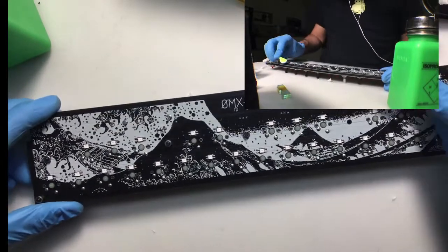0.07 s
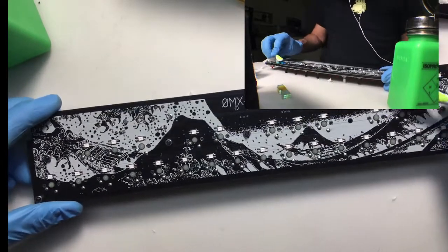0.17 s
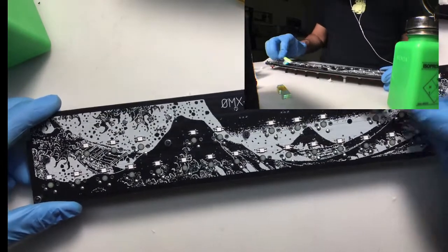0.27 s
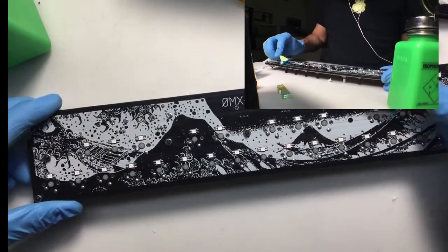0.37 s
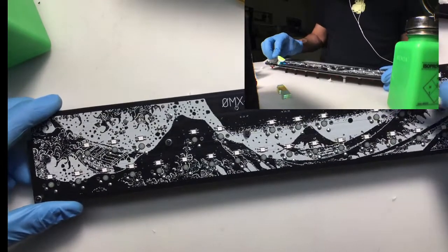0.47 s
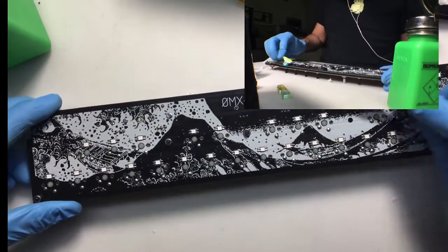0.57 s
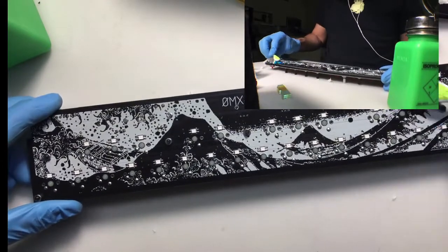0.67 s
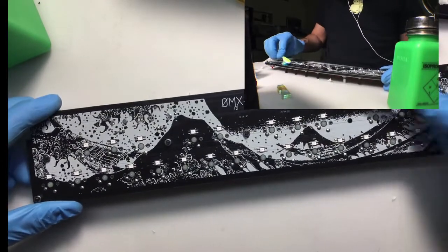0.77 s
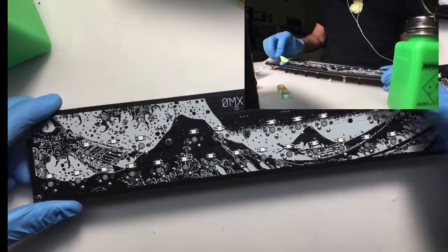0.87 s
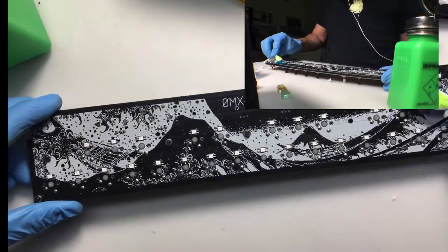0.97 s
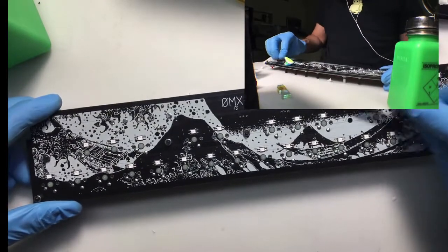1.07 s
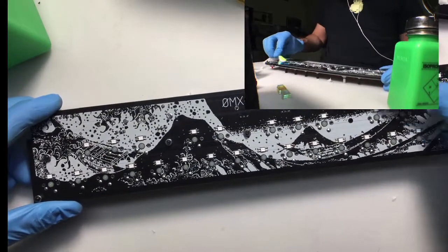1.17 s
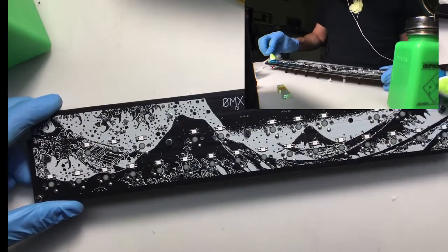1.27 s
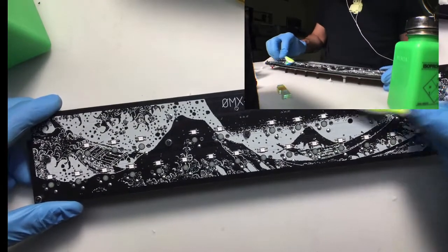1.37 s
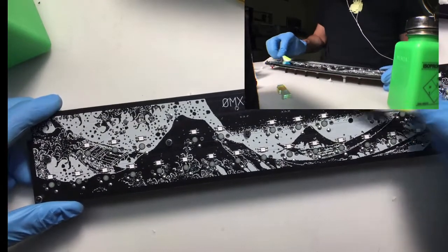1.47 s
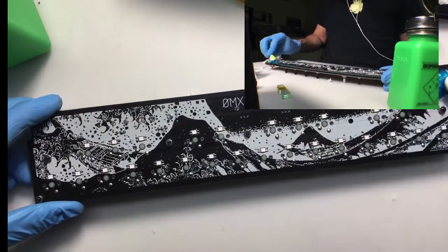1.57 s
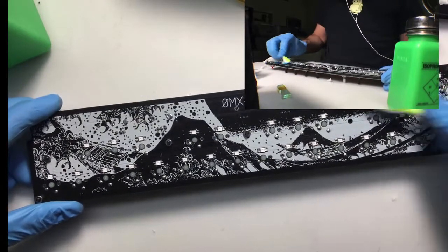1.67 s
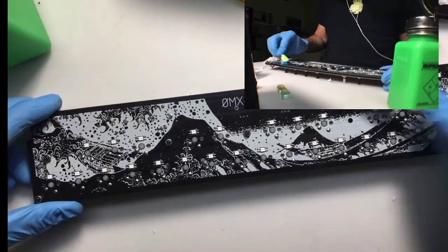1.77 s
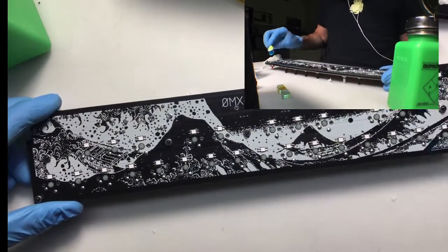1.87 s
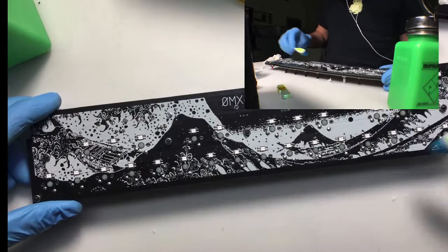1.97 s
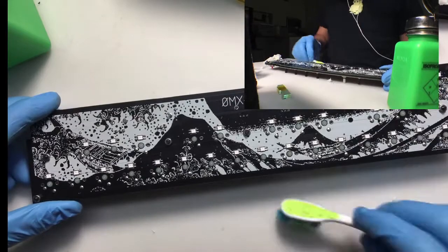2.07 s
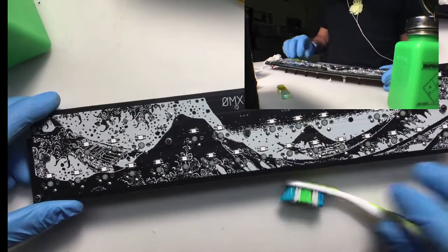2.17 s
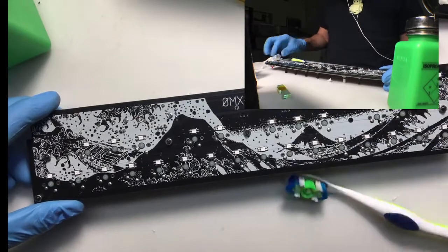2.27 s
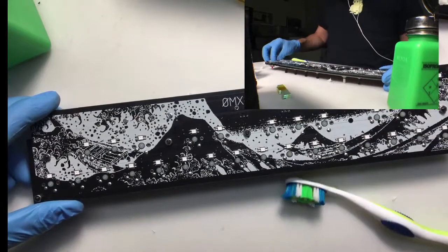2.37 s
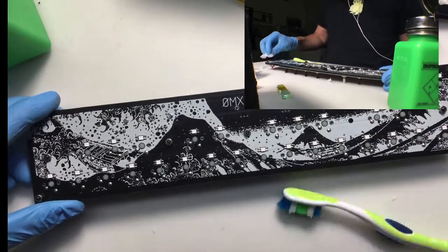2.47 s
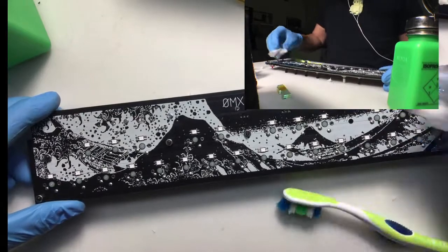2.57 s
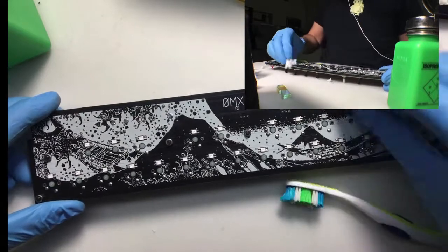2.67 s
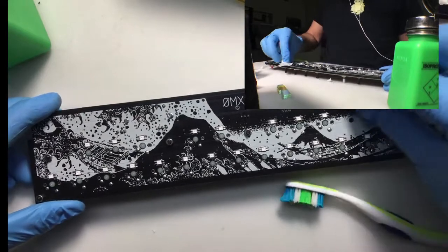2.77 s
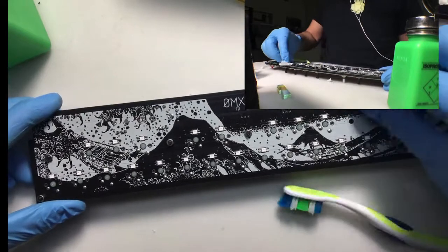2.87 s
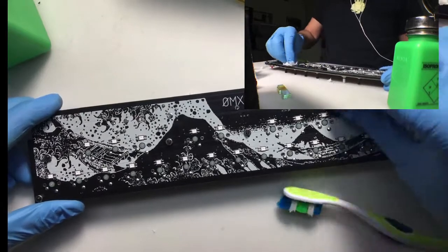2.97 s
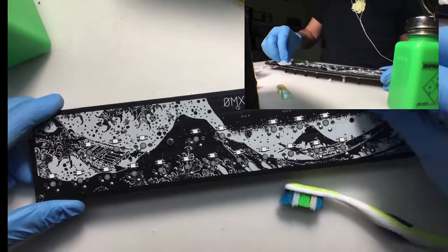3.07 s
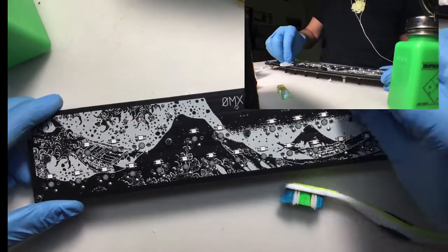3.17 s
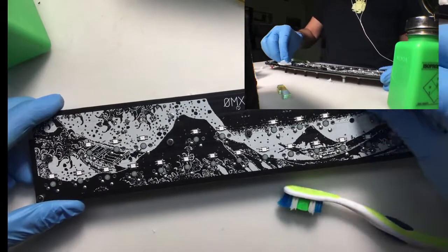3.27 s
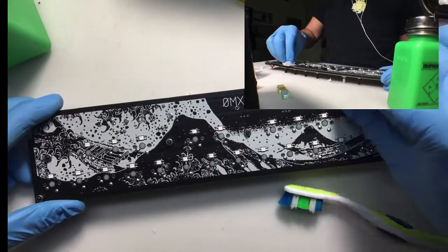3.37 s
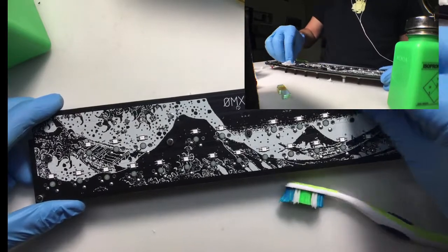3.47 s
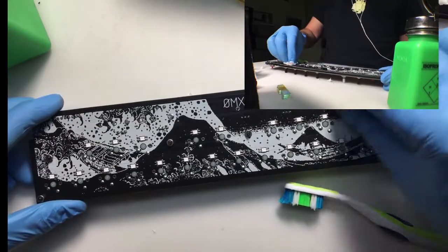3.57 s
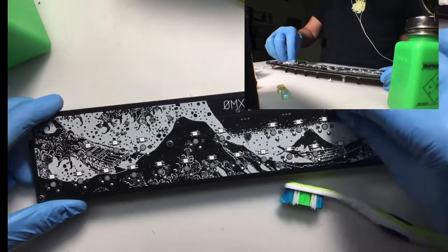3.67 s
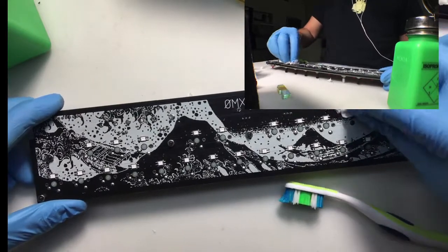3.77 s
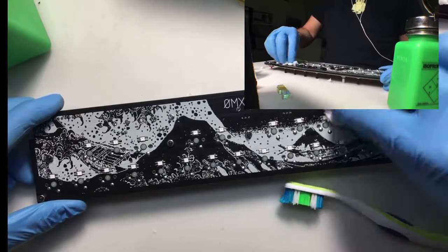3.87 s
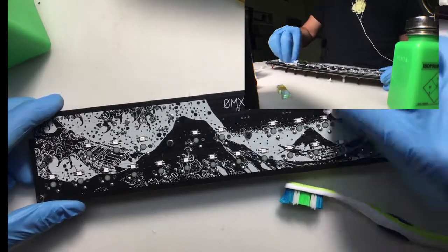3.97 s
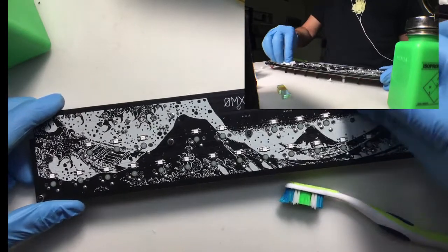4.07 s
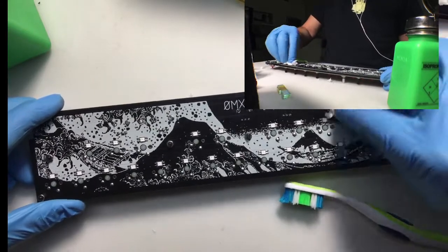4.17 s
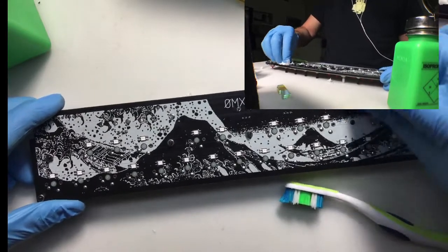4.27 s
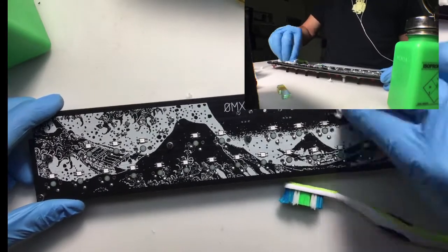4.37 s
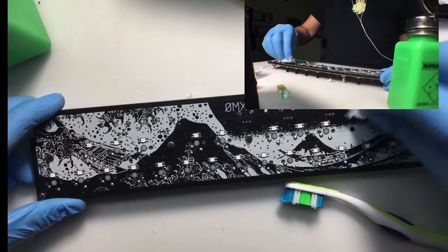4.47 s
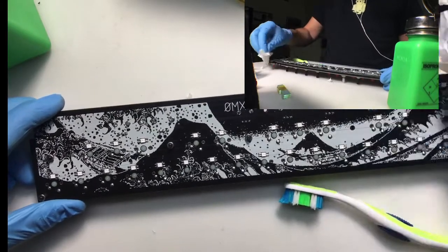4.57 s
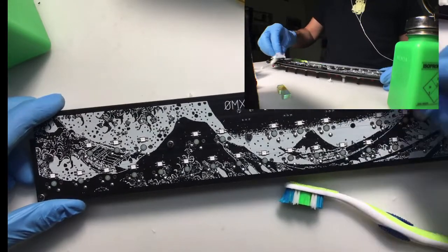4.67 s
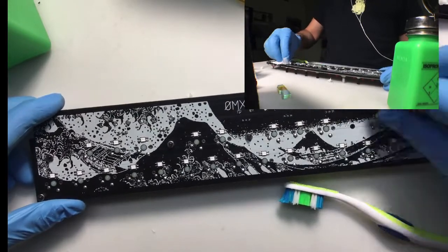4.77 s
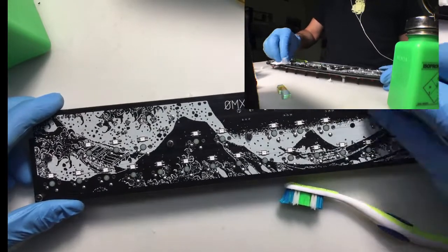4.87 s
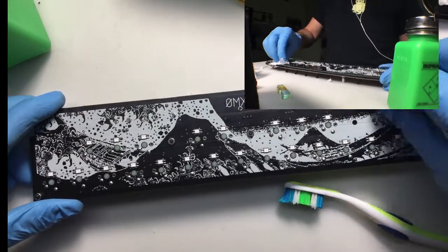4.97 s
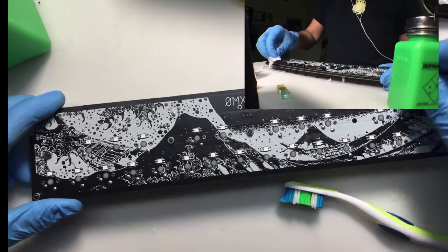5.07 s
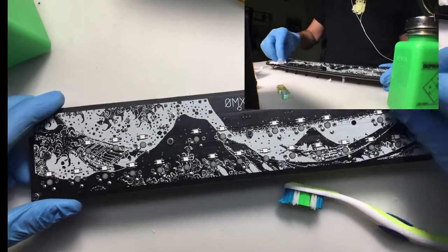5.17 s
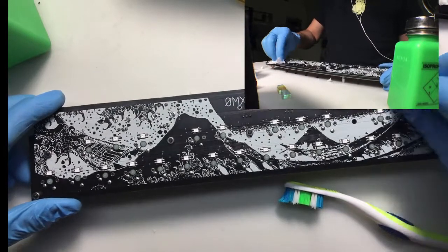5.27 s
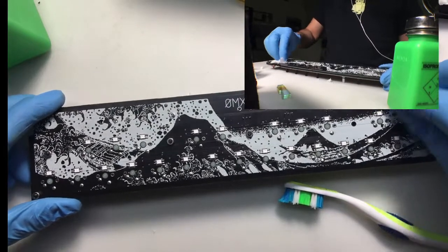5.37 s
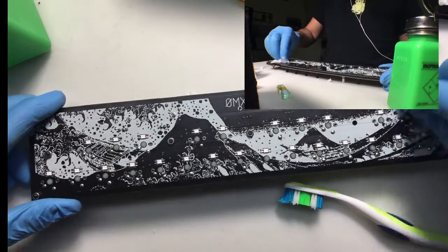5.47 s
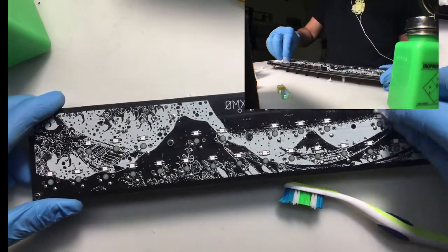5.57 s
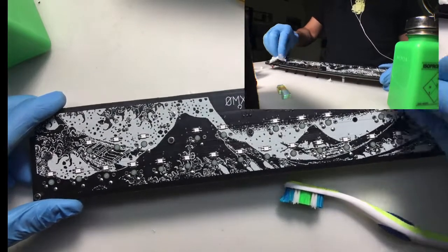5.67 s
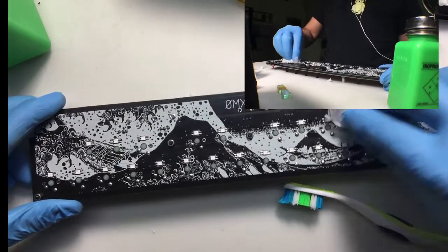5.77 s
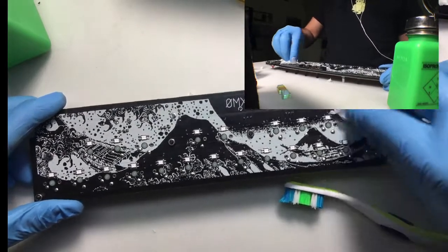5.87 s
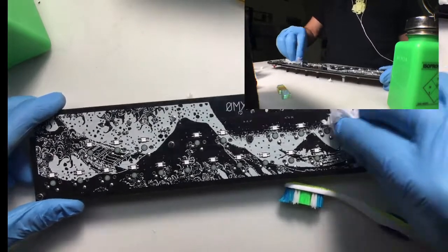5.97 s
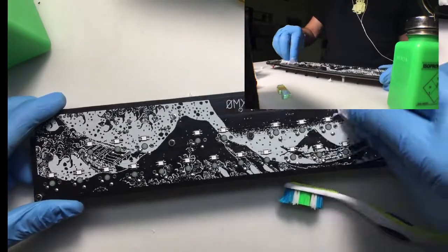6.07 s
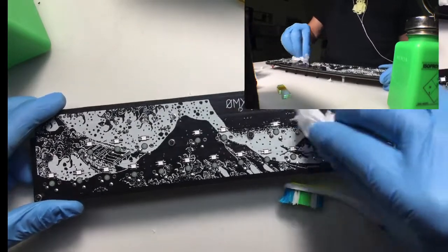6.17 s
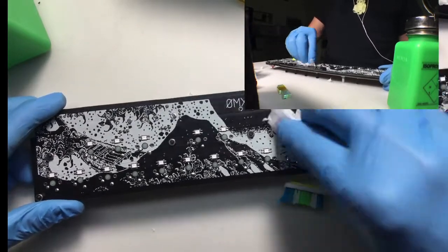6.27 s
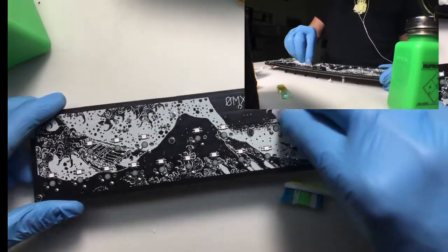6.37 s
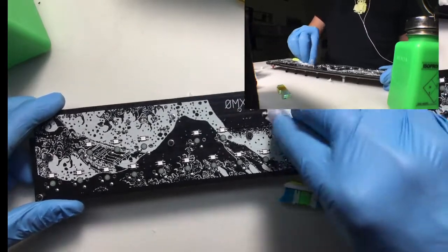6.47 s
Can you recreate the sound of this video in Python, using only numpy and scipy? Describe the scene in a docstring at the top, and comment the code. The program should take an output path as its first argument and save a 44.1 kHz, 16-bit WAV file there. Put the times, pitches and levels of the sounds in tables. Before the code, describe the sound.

Close and dry-sounding in a small room with low fan air: rapid back-and-forth bristle rasps, sharp and sibilant, swelling toward the end of the first second and fading by two. One short dull bench knock stands out as the loudest event. Afterwards come light taps, irregular thin tissue rustles, an occasional firmer scrape and soft thuds of the shifting board.

```python
"""Scrubbing a circuit board

Friction noise: a toothbrush scrubs a circuit board in quick back-and-forth strokes, then a gloved
hand rubs it with a tissue; both are random slips, coloured by a filter and shaped by sliding speed.
Impact sound: the dropped brush gives one dull knock and a small rattle, built from bench modes and
noise cracks; faint ticks and bumps follow. A fan of filtered noise runs in the small, echoing room."""
import sys
import numpy as np
from scipy import signal
from scipy.fft import rfft, irfft
from scipy.io import wavfile
from scipy.ndimage import uniform_filter1d

SR = 44100
rng = np.random.default_rng(int(sys.argv[2]) if len(sys.argv) > 2 else 0)


def master_out(mix):
    """Clip the mix to full scale and print it as 16-bit PCM to the path in sys.argv[1]."""
    frames = np.transpose(np.atleast_2d(mix))
    ceiling = np.clip(frames, -1, 1)
    pcm = np.round(ceiling * 32767).astype(np.int16)
    wavfile.write(sys.argv[1], SR, pcm)


N = 287486
TIME = np.arange(N) / SR  # s
EDGE_HZ = 15900  # upper limit of the audible band here


# brush strokes, push and pull in turn, before the hiss trim:
# (start [s], length [s], level [dB], fizz relative to that level [dB])
STROKES = [(0.001, 0.049, -49, -5), (0.102, 0.071, -55, -7), (0.197, 0.086, -47.5, -4),
           (0.327, 0.085, -49, -4), (0.445, 0.087, -46.5, -6), (0.567, 0.1, -45, -4),
           (0.693, 0.099, -45, -6.5), (0.829, 0.11, -42.5, -6.5), (0.972, 0.099, -49, -4),
           (1.111, 0.14, -41.5, -7), (1.318, 0.064, -46, -9), (1.42, 0.14, -43, -10),
           (1.594, 0.12, -45, -11), (1.731, 0.062, -47, -14)]
# bristle tufts that snag on a part and flick free: (time [s], level before smoothing [dB])
SNAGS = [(0.023, -43), (.2044, -56), (0.2457, -38), (0.5782, -40), (0.731, -41), (0.85, -39), (.986, -52),
         (1.036, -39), (1.059, -47), (1.3433, -36.5), (1.381, -45), (1.7305, -55)]
# colours of bristle friction, body and top: (frequency [Hz], relative density [dB per Hz])
BRISTLE_HISS = [(600, -43), (2400, -25), (3700, -24), (4400, -13.5), (5100, -8), (6050, 2), (7000, -6.5),
                (8300, -11.5), (9300, -17), (11000, -16.5), (14000, -24)]
BRISTLE_FIZZ = [(7500, -36.5), (9500, -28), (10900, -15.5), (12000, 3), (13000, -4), (14000, 3),
                (15900, -8)]
# a push is fastest late in its stroke, a pull early (shares of the stroke time)
STROKE_GLIDE_S, PUSH_FASTEST, PULL_FASTEST = 0.0095, 0.57, 0.41
# the fizz grows faster with speed than the hiss; at the turns the bristles still drag a little
HISS_POWER, FIZZ_POWER, HISS_TRIM_DB, DRAG_DB = 1.52, 2, -1.67, -71


def brush(snag_t60=0.028, snag_fizz_db=-7):
    """Stick-slip friction: nylon bristles flick over solder joints and parts; a snag is a burst of slips."""
    slips = grains(per_s=3000, spread_db=3.0, clump_db=1.7, clump_s=.003, smooth=.6)
    slips = wander(slips, patch_db=3.0, patch_s=.016, patch_hz=260, size=512)

    snags = np.zeros(N)
    for s, db in SNAGS:
        add(snags, s, gain_of(db - 60 * TIME[:SR // 10] / snag_t60))
    snags = uniform_filter1d(snags, size=90)  # about 2 ms, softens each onset

    hiss = gain_of(DRAG_DB) * (TIME < STROKES[-1][0])
    fizz = np.zeros(N)
    for k, (s, length, db, fizz_db) in enumerate(STROKES):
        fastest = PULL_FASTEST if k % 2 else PUSH_FASTEST
        hiss_speed = stroke(s, length, STROKE_GLIDE_S, fastest, HISS_POWER)
        fizz_speed = stroke(s, length, STROKE_GLIDE_S, fastest, FIZZ_POWER)
        hiss = np.hypot(hiss, gain_of(db + HISS_TRIM_DB) * hiss_speed)
        fizz = np.hypot(fizz, gain_of(db + fizz_db) * fizz_speed)

    hiss = np.hypot(hiss, snags)
    fizz = np.hypot(fizz, gain_of(snag_fizz_db) * snags)
    return hiss * colour(slips, BRISTLE_HISS) + fizz * colour(slips, BRISTLE_FIZZ)


# firm rubs of glove or tissue: (start [s], length [s], level [dB], fizz relative to that level [dB])
RUBS = [(2.357, 0.052, -59.5, -0.5), (2.438, 0.13, -61, -1.5), (2.647, 0.049, -60, -16),
        (2.712, 0.062, -64.5, -17), (2.83, 0.083, -56.5, -15), (2.973, 0.056, -60.5, -7),
        (3.085, 0.051, -64, -12), (3.332, 0.032, -64.5, -3), (3.523, 0.051, -58, -3.5),
        (3.661, 0.056, -60.5, -3), (4.036, 0.045, -57.5, -4.5), (4.418, 0.089, -50, -11),
        (5.346, 0.038, -58.5, -0.5), (5.523, 0.034, -63.5, -2.5), (5.765, 0.021, -58, 0),
        (5.815, 0.027, -61, -0.5), (5.894, 0.036, -55.5, -0.5), (5.98, 0.048, -60.5, -0.5),
        (6.075, 0.078, -54, -1), (6.251, 0.036, -58.5, 4), (6.295, 0.034, -54.5, 0), (6.466, 0.06, -66, 2)]
# firm pushes that make the board itself scrape: (start [s], length [s], level [dB])
SCRAPES = [(2.625, 0.24, -71), (4.44, .052, -56), (6.095, 0.039, -57)]
# colours of tissue friction, body and top, and of the board: (frequency [Hz], relative density [dB per Hz])
TISSUE_RUSTLE = [(800, -30), (2500, -12), (4000, -8.5), (5000, -1), (6200, 4), (7900, -1.5), (9500, -9.5),
                 (11500, -20), (15000, -33)]
TISSUE_FIZZ = [(8000, -39), (11800, -21), (13200, 2.5), (14700, 9), (15900, -7)]
BOARD_SCRAPE = [(200, -18), (550, -2), (900, 3), (1500, 3), (2300, -11), (3300, -1.5), (4500, 6.5),
                (5600, -15), (9000, -9)]
RUB_GLIDE_S, RUB_FASTEST, RUB_POWER = 0.0043, 0.4, 2.05
LEAST_RUSTLE, WIPE_FIZZ_DB = 0.057, -11  # power share; level relative to the wipes' rustle


def tissue():
    """Stick-slip friction: paper fibres and glove rubber catch on the board and now and then shift it."""
    slips = grains(per_s=3000, spread_db=3.0, clump_db=1.4, clump_s=.004, smooth=.6)
    slips = wander(slips, patch_db=3.2, patch_s=.02, patch_hz=260, size=512)

    rustle = wiping()
    fizz = gain_of(WIPE_FIZZ_DB) * rustle
    for s, length, db, share_db in RUBS:
        rub = gain_of(db) * stroke(s, length, RUB_GLIDE_S, RUB_FASTEST, RUB_POWER)
        share = gain_of(share_db)
        rustle_share = np.sqrt(max(1 - share ** 2, 0) + LEAST_RUSTLE)  # the power the fizz leaves over
        rustle = np.maximum(rustle, rustle_share * rub)
        fizz = np.maximum(fizz, share * rub)

    scrape = np.zeros(N)
    for s, length, db in SCRAPES:
        scrape += gain_of(db) * stroke(s, length, RUB_GLIDE_S, fastest=.55, power=1.5)
    return (rustle * colour(slips, TISSUE_RUSTLE) + fizz * colour(slips, TISSUE_FIZZ)
            + scrape * colour(slips, BOARD_SCRAPE))


# spells of light to-and-fro wiping: (start [s], end [s], typical level [dB])
WIPING = [(3.206, 3.9, -71), (4.085, 4.28, -69), (4.59, 4.68, -68.5), (4.935, 5.6, -70.5),
          (6.335, 6.42, -73.5)]
WIPES_PER_S, WIPE_SPREAD_DB, WIPE_JITTER_S = 10.2, 2, 0.0062


def wiping(contact=0.64):
    """Amplitude modulation: a loose rhythm of uneven wipes, touching for a share of each swing."""
    out = np.zeros(N)
    swing_s = 1 / WIPES_PER_S
    length = contact * swing_s
    for start, end, db in WIPING:
        for middle in np.arange(start + swing_s / 2, end, swing_s):
            harder, later = rng.standard_normal(2)
            begin = middle + WIPE_JITTER_S * later - length / 2
            wipe = stroke(begin, length, RUB_GLIDE_S, RUB_FASTEST, RUB_POWER)
            out += gain_of(db + WIPE_SPREAD_DB * harder) * wipe
    return out


# blows of the brush landing on the bench: (time [s], relative level [dB], contact low-pass corner [Hz])
BLOWS = [(2.08576, 0, 1230), (2.08731, -6.6, 2700), (2.09017, -13.9, 1610), (2.09242, -21.5, 1640),
         (2.1335, -27, 900)]
# modes of the bench top, before contact filtering: (frequency [Hz], level [dB], t60 [s])
BENCH = [(224, -79, 0.03), (555, -20, 0.024), (650, -26, 0.024), (885, -19.5, 0.052), (1070, -9, 0.016),
         (1390, -19, 0.02), (1600, -17, 0.03), (1860, -21, 0.044), (2250, -12.5, 0.015),
         (2765, -25.5, 0.026), (3230, -27, 0.031)]


def knock(crack_db=-37, crack_t60=0.023):
    """Modal excitation: the rubber-clad handle strikes and chatters; a softer contact gives a duller blow."""
    modes = sum(ring(hz, db, t60) for hz, db, t60 in BENCH)
    out = np.zeros(N)
    for s, db, hardness_hz in BLOWS:
        add(out, s, gain_of(db) * cut(modes, hardness_hz, "low", order=2))
    out = cut(out, hz=3400, kind="low", order=7)
    out = cut(out, hz=111, kind="high", order=4)
    add(out, BLOWS[0][0], snap(crack_db, crack_t60, bright_hz=10700))
    return out


# light taps of the settling brush and of the fingers: (time [s], ring level [dB], ring frequency [Hz])
TAPS = [(2.4501, -33, 730), (2.4697, -44, 2940), (2.4855, -37.5, 3010), (2.72, -47, 8800),
        (2.987, -43, 3700), (2.9876, -45, 4560), (4.0408, -44, 6700), (4.44, -39, 5360),
        (4.4805, -48, 1140), (4.841, -45, 1010), (4.8945, -60, 1076), (5.9064, -44, 8500)]
# a tap swells over part of a cycle; high rings die sooner
TAP_RISE_CYCLES, TAP_T60_AT_1KHZ, TAP_DAMPING = 0.85, 0.025, .3  # cycles, s, exponent
# the snap of a tap follows its strength and pitch
TAP_SNAP_DB, TAP_SNAP_REACH, SNAP_T60 = -4.5, 1.8, .017  # dB on snap's scale, times ring pitch, s


def taps():
    """Damped resonance: each light contact is a snap and one short ring, cushioned by rubber or paper."""
    out = np.zeros(N)
    for s, db, hz in TAPS:
        tone = ring(hz, db, TAP_T60_AT_1KHZ * (1000 / hz) ** TAP_DAMPING)
        cushion = np.minimum(TIME[:len(tone)] * hz / TAP_RISE_CYCLES, 1)
        add(out, s, cushion * tone + snap(db + TAP_SNAP_DB, SNAP_T60, TAP_SNAP_REACH * hz))
    return out


# rocking of the board on the bench: (time [s], thud level [dB], click level on snap's scale [dB])
BUMPS = [(4.753, -55.5, -66), (5.769, -48, -36), (6.257, -47, -49), (6.2656, -51, -34)]
BUMP_HZ, BUMP_T60, BUMP_CLICK_FROM_HZ, BUMP_BRIGHT_HZ = 196, 0.037, 4400, 12500  # t60 in s


def bumps(click_t60=0.014):
    """Impact response: the board's edge clicks on the bench, which answers with one low, damped mode."""
    out = np.zeros(N)
    for s, thud_db, click_db in BUMPS:
        click = snap(click_db, click_t60, BUMP_BRIGHT_HZ)
        click = cut(click, BUMP_CLICK_FROM_HZ, "high", order=1)
        add(out, s, ring(BUMP_HZ, thud_db, BUMP_T60) + click)
    return out


# spells when the hands scrub, reach or wipe: (start [s], end [s], level added in power to rest [dB])
SHUFFLES = [(0, 1.8, -62), (2.48, 2.907, -61.5), (2.95, 3.84, -69), (6.0, 6.8, -71)]
# colour of the sliding board and gloves: (frequency [Hz], relative density [dB per Hz])
SHUFFLE_COLOUR = [(40, -35.5), (150, -0.5), (300, 0.5), (560, 3.5), (1000, -2), (1700, -11.5), (3000, -9.5),
                  (5000, -19), (12000, -33)]
SHUFFLE_REST_DB, SHUFFLE_EASE_S = -68.5, 0.14


def shuffle():
    """Sliding friction: the held board and the gloves slip a little on the bench."""
    slips = grains(per_s=1500, spread_db=3.5, clump_db=2.5, clump_s=0.055, smooth=1.4)
    busy = np.zeros(N)
    for start, end, db in SHUFFLES:
        inside_s = np.minimum(TIME - start, end - TIME)
        busy += gain_of(db) * np.clip(inside_s / SHUFFLE_EASE_S + .5, 0, 1)
    return np.hypot(gain_of(SHUFFLE_REST_DB), busy) * colour(slips, SHUFFLE_COLOUR)


# air noise of the fan: (frequency [Hz], relative density [dB per Hz])
FAN_AIR = [(18, -42), (30, -38), (108, -22.5), (225, -3), (591, -0.5), (970, -5), (1110, -7), (1400, -10.5),
           (1970, -11.5), (2240, -20.5), (3880, -18.5), (4780, -18.5), (6210, -22.5), (8280, -26),
           (15500, -37)]
# narrow resonances of the fan: (frequency [Hz], full width at half amplitude [Hz], rms level [dB])
FAN_TONES = [(69, 9.3, -93), (354, 9.8, -75), (580, 145, -72.5), (738, 103, -72.5), (1210, 65, -78),
             (1382, 15, -80.5), (1940, 150, -101.5), (3900, 260, -78)]


def fan():
    """Broadband flow noise with narrow-band resonances: steady air noise and a few fuzzy tones."""
    out = gain_of(-62.0) * colour(rng.standard_normal(N), FAN_AIR)
    f = np.fft.rfftfreq(N, 1 / SR)
    for hz, width, db in FAN_TONES:
        resonance = 1 / (1 + ((f - hz) / width * 2) ** 2)
        tone = irfft(rfft(rng.standard_normal(N)) * resonance, N)
        out += gain_of(db) * evened(tone)
    return out


# reverberation of the room: (frequency [Hz], t60 [s])
ROOM = [(150, 0.54), (600, 0.31), (1400, 0.39), (3000, 0.36), (8000, 0.25), (15000, 0.16)]


def room(x, first_s=0.0099, echoes_per_s=3000):
    """Reverberation: sparse echoes off bench and walls, each band decaying at its own rate."""
    echoes = rng.choice([-1., 1.], SR) * (rng.random(SR) < echoes_per_s / SR)
    echoes *= TIME[:SR] > first_s
    hz, t, z = signal.stft(echoes, SR, nperseg=256)
    decay = gain_of(-60 * t / read(ROOM, hz)[:, None])
    tail = signal.istft(z * decay, SR, nperseg=256)[1]
    return signal.fftconvolve(x, tail / np.linalg.norm(tail))[:N]


def stroke(start, length, glide_s, fastest, power):
    """Speed-dependent friction: gain as a power of sliding speed, which rises to one peak and falls."""
    moments = [start - glide_s, start + length * fastest, start + length + glide_s]
    way = np.interp(TIME, moments, [0, 1, 0])
    moving = way > 0
    way[moving] = np.sin(np.pi / 2 * way[moving]) ** power
    return way


def grains(per_s, spread_db, clump_db, clump_s, smooth):
    """Stick-slip as a random pulse train: unequal slips over a smooth sliding noise, all in clumps."""
    size = gain_of(spread_db * np.minimum(rng.exponential(1, N), 6)) * rng.choice([-1, 1], N)
    slips = evened(size * (rng.random(N) < per_s / SR))
    clumps = evened(uniform_filter1d(rng.standard_normal(N), max(1, round(clump_s * SR))))
    return (slips + smooth * rng.standard_normal(N)) * gain_of(clump_db * clumps)


def wander(x, patch_db, patch_s, patch_hz, size):
    """Random spectral modulation: smoothed random gains make patches swell and fade in time and frequency."""
    z = signal.stft(x, nperseg=size)[2]
    patches = rng.standard_normal(z.shape)
    for _ in range(2):
        patches = uniform_filter1d(patches, max(1, round(patch_s * SR * 2 / size)), axis=1)
        patches = uniform_filter1d(patches, max(1, round(patch_hz * size / SR)), axis=0)
    return signal.istft(z * gain_of(patch_db * evened(patches)), nperseg=size)[1][:N]


def snap(db, t60, bright_hz):
    """Contact transient: a decaying noise crack of two surfaces; softer ones reach less high."""
    t = TIME[:SR // 4]
    burst = cut(rng.standard_normal(len(t)), min(bright_hz, EDGE_HZ), "low", order=2)
    return burst * gain_of(db - 60 * t / t60) / 2  # halved: the snap scale


def ring(hz, db, t60):
    """Damped free vibration: one struck mode with exponential decay."""
    t = TIME[:SR // 4]
    return gain_of(db - 60 * t / t60) * np.cos(2 * np.pi * hz * t)


def colour(x, spectrum, size=4096):
    """Minimum-phase filtering: a causal response of the given spectrum keeps clicks sharp; rms 1."""
    log_gain = np.log(gain_of(read(spectrum, abs(np.fft.fftfreq(size, 1 / SR)))))
    response = np.fft.ifft(np.exp(np.conj(signal.hilbert(log_gain)))).real
    return evened(signal.oaconvolve(x, response[:size // 2])[:len(x)])


def cut(x, hz, kind, order):
    """Butterworth filtering: low-pass or high-pass."""
    return signal.sosfilt(signal.butter(order, hz, kind, fs=SR, output="sos"), x)


def read(points, hz):
    """Interpolation of a (frequency, value) table on a log-frequency axis."""
    f, value = np.transpose(points)
    return np.interp(np.log(hz + 1), np.log(f + 1), value)


def evened(x):
    """Normalization to an rms of 1."""
    return x / np.sqrt(np.mean(x ** 2) + 1e-20)


def gain_of(db):
    """Level to amplitude: 20 dB a decade."""
    return 10 ** (np.asarray(db) / 20)


def add(mix, s, sound):
    """Superposition: mixes a sound in at time s."""
    part = mix[round(s * SR):][:len(sound)]
    part += sound[:len(part)]


def scene():
    """Superposition of direct and reverberant sound: close sounds with a little room, over the fan."""
    rubbing = brush() + tissue()
    hits = knock() + taps() + bumps()
    echoes = room(gain_of(-22.0) * rubbing + gain_of(-16.5) * hits)
    return (rubbing + hits + echoes + shuffle() + fan())[None]


def record(dry):
    """Band limitation: a linear-phase low-pass at the upper edge."""
    low_pass = signal.firwin(511, EDGE_HZ, window=("kaiser", 9), fs=SR)
    return signal.oaconvolve(dry, low_pass[None], "same")


dry = scene()
out = record(dry)
master_out(out)
```